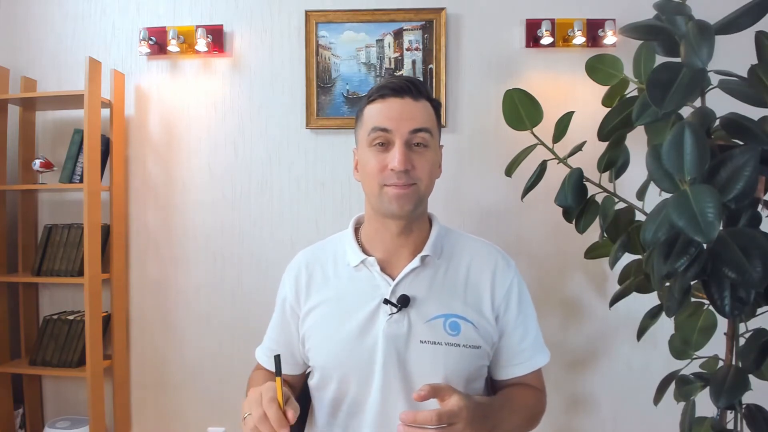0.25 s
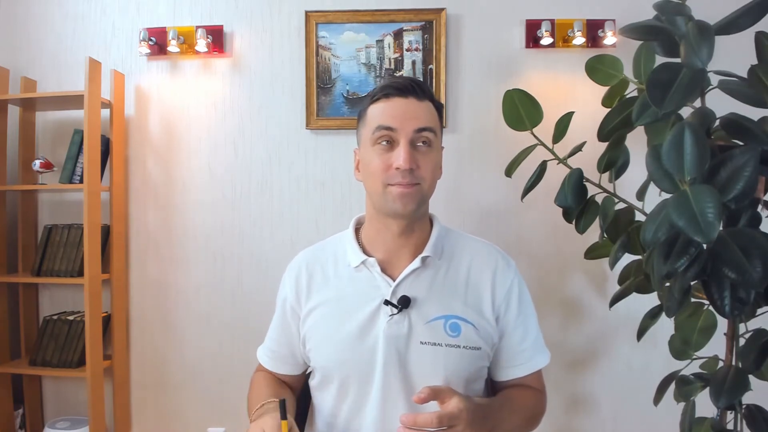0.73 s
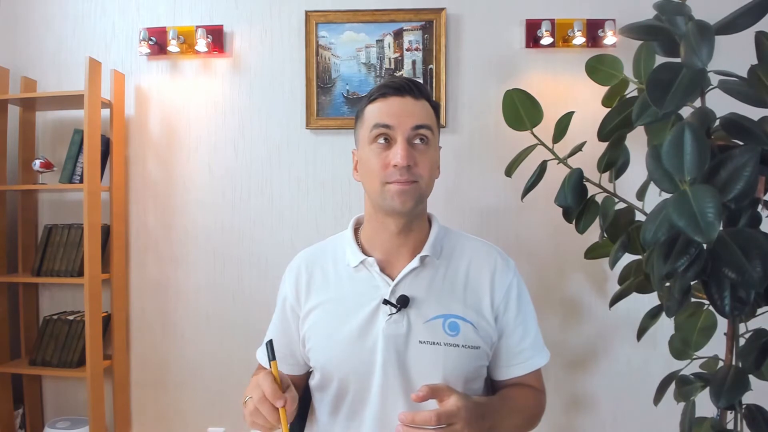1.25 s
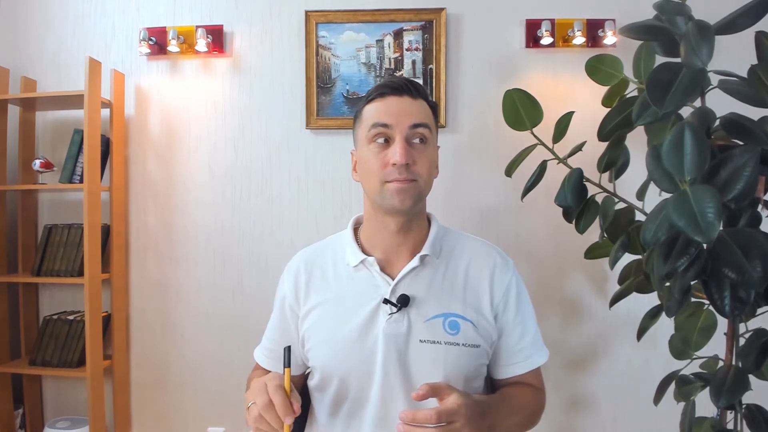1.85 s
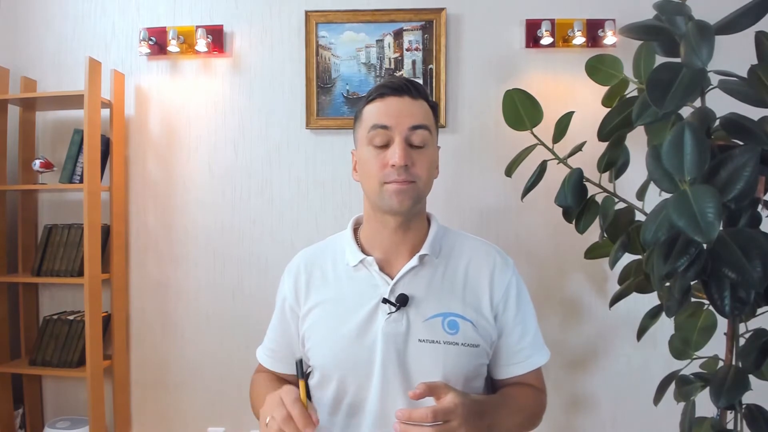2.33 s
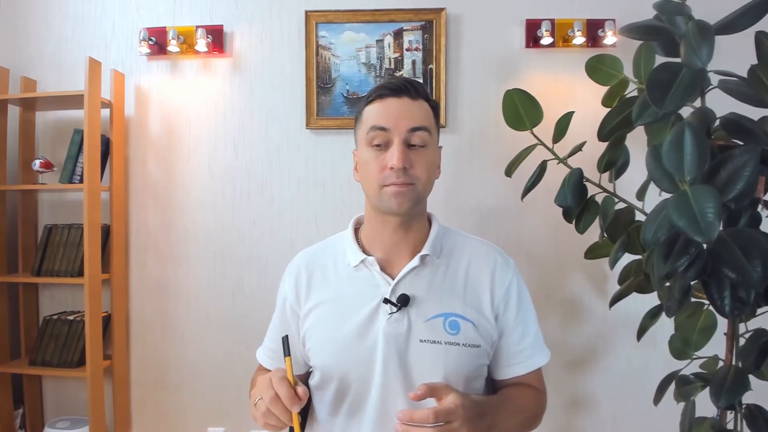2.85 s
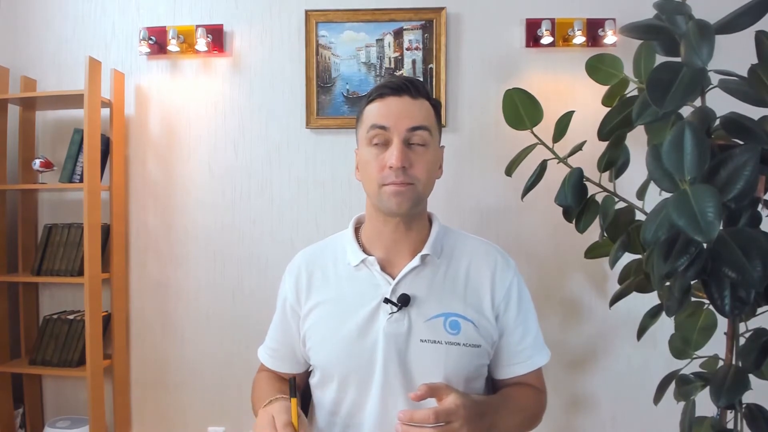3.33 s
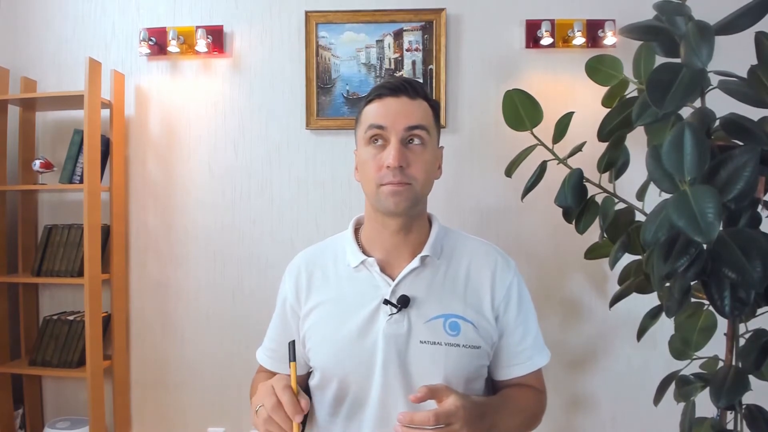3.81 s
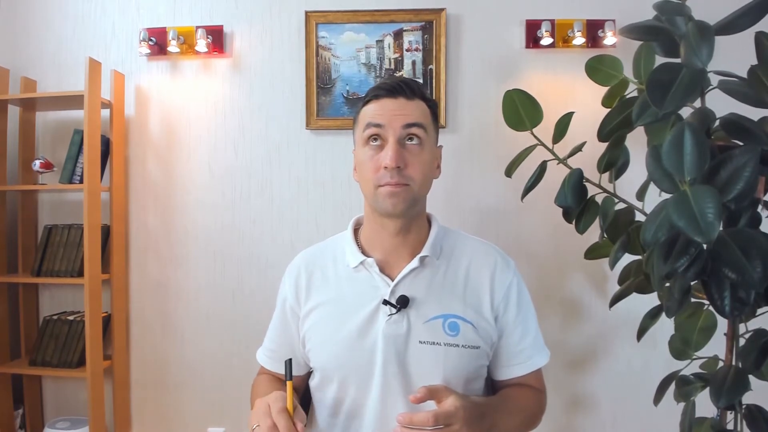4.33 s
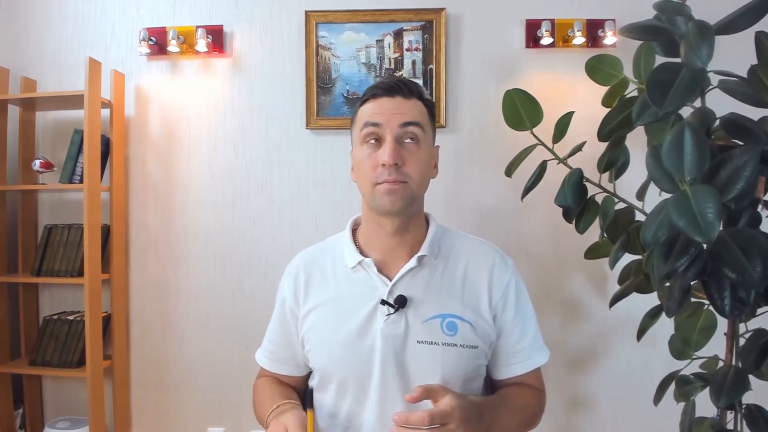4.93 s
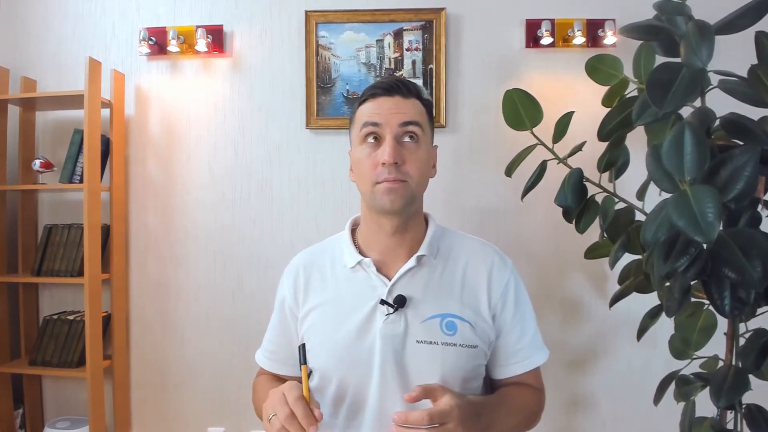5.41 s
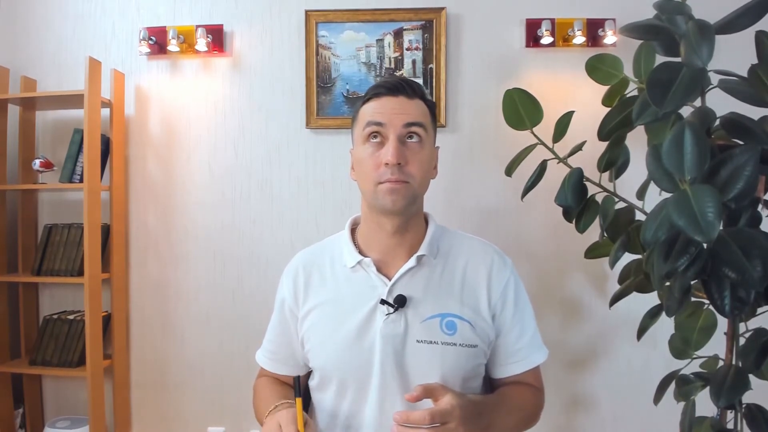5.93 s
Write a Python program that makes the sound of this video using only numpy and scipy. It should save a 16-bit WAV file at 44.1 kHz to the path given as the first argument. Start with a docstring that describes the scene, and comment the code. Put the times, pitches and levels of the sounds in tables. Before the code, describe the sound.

A pen taps a wooden desk in a quiet room, heard through a clip-on microphone. The sound opens on the fading echo of an earlier tap, with a very faint bright hiss for the first half second. Seven taps follow in a slow, steady beat, at about 0.6, 1.5, 2.3, 3.2, 4.0, 4.8 and 5.7 seconds. Each is a short woody knock with a sharp plastic tick, and the bare walls ring for about 0.7 seconds afterwards. The taps stay about equally loud, shifting slightly in tone as the pen lands on different spots. A low electrical hum, soft rumble and light hiss lie underneath throughout. A barely audible thin, high squeak passes at about 1.6 seconds, and two very faint, short pulses of a low tone come at about 4.5 and 5 seconds.

```python
"""A pen taps a wooden desk in a slow, steady beat, picked up by a clip-on microphone.
Each tap is the desk's short ring plus the plastic tick of tip and barrel; a bare-walled room
answers for about 0.7 s. Mains hum, rumble and hiss lie underneath, with a faint bright hiss
at the start, one thin squeak and two soft pulses of a low tone."""
import sys
import numpy as np
from scipy import signal
from scipy.fft import rfft, irfft, next_fast_len
from scipy.io import wavfile
from scipy.ndimage import uniform_filter1d, map_coordinates

SR = 44100
rng = np.random.default_rng(int(sys.argv[2]) if len(sys.argv) > 2 else 0)


def wrap_up_sound(samples):
    """Save the sound to the file named by the first command line argument, as 16-bit audio."""
    columns = np.atleast_2d(samples).T
    # keep every value between -1 and 1, then stretch to whole-number steps
    tamed = np.clip(columns, -1, 1)
    steps = np.round(tamed * 32767).astype(np.int16)
    wavfile.write(sys.argv[1], SR, steps)


N = 271656

# room decay: f/Hz, t60/s
ROOM_T60 = [(120, 0.78), (450, 0.6), (1000, 0.8), (2200, 0.82), (4000, .62), (7000, 0.41), (14000, .36)]


def tapping(modes_db=-1, movement=.45):
    """Pen taps in one room, whose answer changes a little as hand and body move."""
    # taps: t/s, knock level/dB, tick level/dB, spot on the desk; the first lands before t = 0
    taps = [(-.16, 0, 3.5, 1.54), (0.6254, -0.1, 3.5, 0.013), (1.4642, -0.4, -0.5, 1),
            (2.32, -0.5, -1.5, 2), (3.1554, 0.76, 1.2, 1.86), (4.016, 0.04, -1, 2.4),
            (4.8475, -0.5, -1.2, 1.82), (5.6589, -1.3, -0.5, 2.12)]
    t = np.arange(SR) / SR
    out = np.zeros(N + 2 * SR)  # 1 s margin at each end
    still_tail = room_tail(t)
    modes = amp(modes_db) * standing_waves(t)
    for start_s, knock_db, tick_db, spot in taps:
        tap = amp(knock_db) * desk_knock(spot) + amp(tick_db) * pen_tick(t)
        diffuse = (still_tail + movement * room_tail(t)) / np.hypot(1, movement)
        reverb = signal.fftconvolve(tap, modes + diffuse)[:SR]
        out[SR + round(start_s * SR):][:SR] += near_echoes(tap) + reverb
    return out[SR:][:N]


def desk_knock(spot, crossing_s=.0016, direct_share=.59):
    """The board rings; where the pen lands (spot 0 to 2) sets the strength of each resonance."""
    # desk resonances: f/Hz, half width/Hz, level/dB at spot 0, at spot 1, at spot 2
    desk_modes = [(130.8, 53, 2.5, -8.5, -2.5), (310.6, 106, 10, 10.5, 9), (428, 67, 15, 13, 10),
                  (619, 170, 10, 14.5, 12.5), (829, 63, 13, 14, 14.5), (986.6, 80, 21, 8, 20),
                  (1096, 67, 21.5, 19.5, 3), (1283, 63, 13.5, 26, 20.5), (1472, 100, 19, 17, 17.5),
                  (1590, 52, 16, 15, 14.5), (1725, 90, 19, 13.5, 17.5), (1876, 46, 18.5, 20, 4.5),
                  (2050, 70, 13.5, 15.5, 8.5), (2255, 130, 3.5, 5.5, 10), (2472, 78, 11, 8, 6.5),
                  (2717, 120, 10, 9, 4.5), (3032, 249, 9, 6, 6)]
    struck = [(hz, width_hz, np.interp(spot, [0, 1, 2], levels_db))
              for hz, width_hz, *levels_db in desk_modes]
    board = resonances(struck, scatter_db=1.02)
    # all-pass: part of the blow arrives at once, the rest runs between the board's edges first
    trip = lambda hz: np.exp(-2j * np.pi * hz * crossing_s)
    return filtered(board, lambda hz: (direct_share + trip(hz)) / (1 + direct_share * trip(hz)))


def pen_tick(t, barrel_db=.5, crack_db=-33, crack_t60_s=.016, crack_band_hz=(5000, 14500)):
    """The tip cracks against the wood and the barrel rings for a few milliseconds."""
    # barrel resonances: f/Hz, half width/Hz, level/dB
    barrel_modes = [(4090, 130, 1.5), (4655, 290, 1), (5440, 250, -2), (6260, 290, -8.5)]
    band = signal.butter(2, crack_band_hz, 'bandpass', fs=SR, output='sos')
    crack = signal.sosfilt(band, rng.standard_normal(len(t)) * fade(t, crack_t60_s))
    barrel = resonances(barrel_modes, scatter_db=.76)
    return amp(barrel_db) * barrel + amp(crack_db) * crack


def resonances(modes, scatter_db):
    """1 s minimum-phase ring of a struck body, each resonance at a slightly random strength."""
    hz = np.fft.rfftfreq(SR, 1 / SR)
    power = sum(amp(db + rng.normal(0, scatter_db)) ** 2 / (1 + ((hz - centre_hz) / width_hz) ** 2) ** 2
                for centre_hz, width_hz, db in modes)
    cepstrum = irfft(np.log(power + 1e-12) / 2, SR)
    causal = 1 + np.sign(np.fft.fftfreq(SR))
    return irfft(np.exp(rfft(cepstrum * causal)), SR)


def near_echoes(x, cutoff_hz=4200):
    """Direct sound plus first reflections, which lose their treble."""
    # reflections off desk top, chest and near furniture: delay/s, gain
    echoes = [(.00187, 0.25), (.00271, 0.37), (.00678, 0.21), (.00815, -0.21), (.00911, -.13),
              (0.0172, -0.3)]
    copies = lambda hz: sum(gain * np.exp(-2j * np.pi * hz * delay_s) for delay_s, gain in echoes)
    return filtered(x, lambda hz: 1 + copies(hz) / (1 + (hz / cutoff_hz) ** 4))


def room_tail(t, build_s=.0013):
    """Dense reflections build up, then each frequency dies at its own rate."""
    # wall colouring: f/Hz, level/dB
    wall_colour = [(100, 4.5), (250, 1), (500, -8.5), (800, 1), (1200, -5.5), (1800, -4), (2400, 4),
                   (3000, -8.5), (3700, -10.5), (4800, -9), (7000, -2.5), (11000, -10.5), (15000, -9.5)]
    hz, frame_s, noise = signal.stft(rng.standard_normal(len(t)), SR, nperseg=256)
    decaying = noise * fade(frame_s, along(ROOM_T60, hz)[:, None])
    tail = signal.istft(decaying, SR, nperseg=256)[1][:len(t)]
    n_fft = 2 * len(t)
    spectrum = rfft(tail * (1 - np.exp(-t / build_s)), n_fft)
    # a diffuse field shares its energy evenly between neighbouring bands
    band_power = np.abs(uniform_filter1d(np.abs(spectrum) ** 2, size=90))
    even = spectrum / np.sqrt(band_power + 1e-12)
    colour = amp(along(wall_colour, np.fft.rfftfreq(n_fft, 1 / SR)))
    return irfft(even * colour, n_fft)[:len(t)]


def standing_waves(t):
    """Single room modes stand out of the diffuse tail and die at the same rate."""
    # room modes: f/Hz, relative level at resonance/dB
    room_modes = [(126, 20), (143, 12.5), (258, 5.5), (291, 3), (319, 10), (430, 5), (636, 3.5), (803, 5.5),
                  (945, 8), (1043, 9), (1236, 6.5), (1263, 6), (1336, 4), (1577, -3), (1727, -1),
                  (1906, 3.5), (2026, 5.5)]
    out = np.zeros(len(t))
    for hz, db in room_modes:
        decay = fade(t, along(ROOM_T60, hz))
        out += amp(db) * np.sin(2 * np.pi * hz * t) * decay * 2 / decay.sum()
    return out


def mains_hum(hz=50, rms_db=-47):
    """A steady sine at mains frequency."""
    t = np.arange(N) / SR
    return amp(rms_db) * unit(np.sin(2 * np.pi * hz * t))


def noise_floor():
    """Low room rumble and microphone hiss."""
    # noise spectrum: f/Hz, density/(dB re 1/Hz)
    density = [(20, -62), (35, -75), (70, -86), (100, -84), (160, -103), (300, -99), (550, -103),
               (1000, -103), (2000, -106), (3500, -112), (8000, -113.5), (16000, -116)]
    return np.sqrt(SR / 2) * filtered(rng.standard_normal(N), lambda hz: amp(along(density, hz)))


def low_tone(hz=165, length_s=.215):
    """A faint low tone sounds twice, alike in pitch and length."""
    # tone pulses: t/s, level/dB
    pulses = [(4.505, -64), (4.965, -65.5)]
    t = np.arange(N) / SR
    envelope = sum(amp(db) * swell(t - start_s, length_s, attack_s=.05, release_s=.05)
                   for start_s, db in pulses)
    return envelope * unit(np.sin(2 * np.pi * hz * t))


def high_hiss(centre_hz=9300, half_width_hz=4000, rms_db=-77):
    """A faint, bright hiss that lasts until the first full tap."""
    band = filtered(rng.standard_normal(N), lambda hz: 1 / (1 + ((hz - centre_hz) / half_width_hz) ** 2))
    envelope = swell(np.arange(N) / SR, length_s=.65, attack_s=.02, release_s=.063)
    return amp(rms_db) * envelope * unit(band)


def squeak(start_s=1.58, top_hz=14200, waver_hz=110, top_db=-78, fade_db_per_s=12):
    """A thin, wavering tone swells as its pitch shoots up, then sags and fades."""
    rise_s, rise_hz_per_s = .075, 21000
    sag_s, sag_hz_per_s = .25, 4400
    t = np.arange(N) / SR - start_s
    before_top_s = np.clip(rise_s - t, 0, rise_s)
    after_top_s = np.clip(t - rise_s, 0, sag_s)
    glide_hz = top_hz - rise_hz_per_s * before_top_s - sag_hz_per_s * after_top_s
    hz = glide_hz + waver_hz * wobble(knots_per_s=260)
    tone = unit(np.sin(2 * np.pi * np.cumsum(hz) / SR))
    envelope = swell(t, rise_s + sag_s, attack_s=rise_s, release_s=.04)
    return amp(top_db - fade_db_per_s * after_top_s) * envelope * tone


def amp(db):
    """Decibels to gain."""
    return 10 ** (np.asarray(db) / 20)


def unit(x):
    """Scale to rms 1."""
    return x / np.sqrt(np.mean(x ** 2) + 1e-20)


def along(points, hz):
    """Interpolate (f/Hz, value) points on a log frequency axis."""
    point_hz, values = np.transpose(points)
    return np.interp(np.log(hz + 1), np.log(point_hz + 1), values)


def filtered(x, response):
    """Apply a complex frequency response."""
    n_fft = next_fast_len(len(x) + SR // 2)
    return irfft(rfft(x, n_fft) * response(np.fft.rfftfreq(n_fft, 1 / SR)), n_fft)[:len(x)]


def fade(t, t60_s):
    """Exponential decay, 60 dB in t60_s."""
    return np.exp(-np.log(1000) * t / t60_s)


def swell(t, length_s, attack_s, release_s):
    """Linear attack, hold and release from t = 0."""
    return np.clip(np.minimum(t / attack_s, (length_s - t) / release_s), 0, 1)


def wobble(knots_per_s):
    """A smooth random curve."""
    knots = rng.standard_normal(int(N * knots_per_s / SR) + 4)
    return map_coordinates(knots, [np.arange(N) * knots_per_s / SR])


def scene():
    """The taps over the quiet room, mono."""
    return (tapping() + mains_hum() + noise_floor() + low_tone() + high_hiss() + squeak())[None]


def record(dry):
    """The recorder has a band limit and a constant negative offset."""
    top_hz, dc_offset = 15850, -.0685
    return dc_offset + filtered(dry[0], lambda hz: hz < top_hz)[None]


dry = scene()
out = record(dry)
wrap_up_sound(out)
```